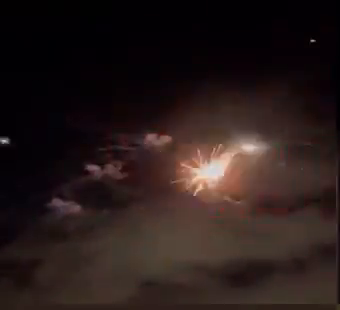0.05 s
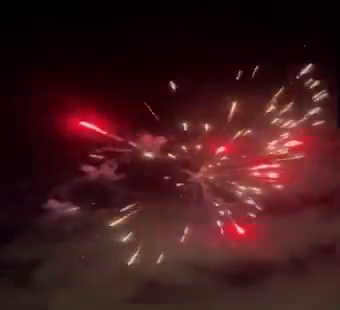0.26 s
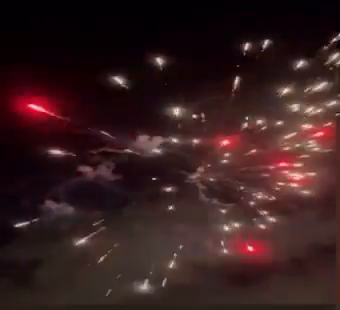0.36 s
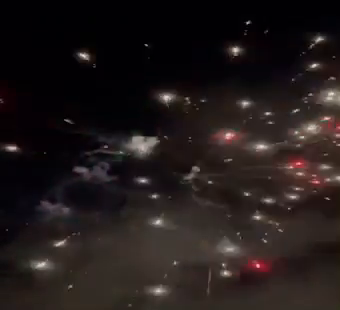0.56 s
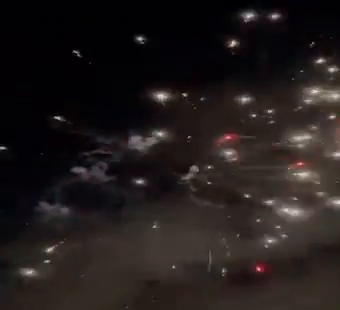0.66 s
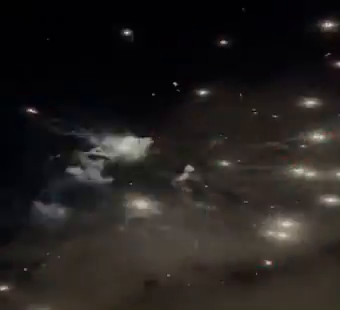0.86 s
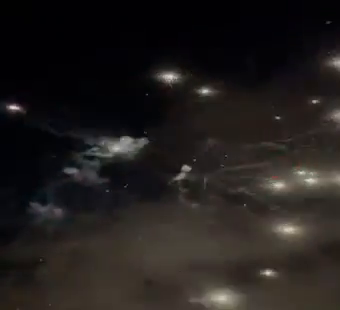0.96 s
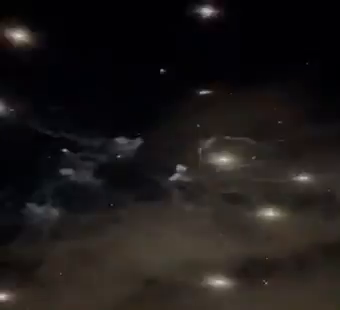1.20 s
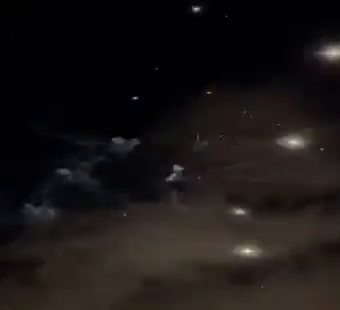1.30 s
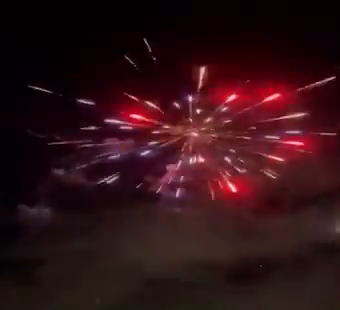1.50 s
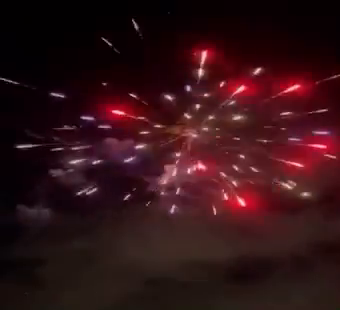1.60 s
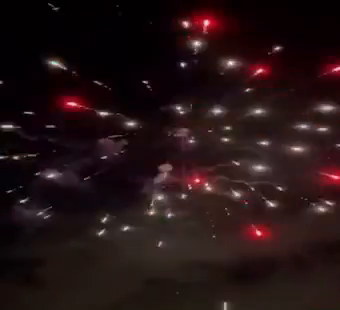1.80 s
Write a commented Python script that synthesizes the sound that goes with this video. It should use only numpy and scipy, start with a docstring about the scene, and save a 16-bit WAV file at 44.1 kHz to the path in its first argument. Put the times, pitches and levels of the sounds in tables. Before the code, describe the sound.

Firework shells explode with two sharp, heavy bangs over a second apart, echoes rumbling into quiet

```python
"""Open ground at night: two firework shells burst high overhead while the roll of an earlier one dies away.
Each blast is a pressure wave with a dull, rough lead-in, a ground bounce, a short ringing and a spit of treble.
Far walls and trees return filtered, smeared copies; noise and sparse knocks form a roll that swells and fades.
Faint steady noise lies beneath. The small recorder delays bass more than treble: each blast is a falling chirp."""
import sys
import numpy as np
from scipy import signal
from scipy.fft import rfft, irfft, next_fast_len
from scipy.io import wavfile
from scipy.ndimage import uniform_filter1d

SR = 44100
rng = np.random.default_rng(int(sys.argv[2]) if len(sys.argv) > 2 else 0)


def transcribe(signal):
    """Save signal, clipped to [-1, 1], as a 16-bit WAV file at the path in sys.argv[1]."""
    frames = np.atleast_2d(signal).T
    limited = np.clip(frames, -1, 1)
    pcm = np.round(limited * 32767).astype(np.int16)
    wavfile.write(sys.argv[1], SR, pcm)


N = 81585
SIZE = next_fast_len(N + 8192)  # padded transform length
HZ = np.fft.rfftfreq(SIZE, 1 / SR)

# Shell bursts; the first precedes the start, so only its roll is heard:
# start_s, blast_db, roll_db, bounce_delay_ms, bounce_left_db, bounce_right_db
BURSTS = [(-1.3, 0, -6.5, 7.5, -8, -12), (.22597, 0.5, 1, 7.4, -5.5, -14),
          (1.5564, 0.5, -1, 7.95, -2, -10.5)]
# Diffuse roll after each burst, each band relative to its own level in the 0.23 s row:
# delay_s, bass_db, body_db, middle_db, treble_db
ROLL = [(.004, -54, -54, -16.5, -26), (.02, -42, -22.5, -35.5, -41.5), (.045, -34, -26, -39.5, -41.5),
        (.09, -41, -29, -43, -51.5), (.13, -29.5, -32, -37.5, -48.5), (.19, -34.5, -26, -36.5, -44),
        (.23, -35.5, -27, -31.5, -49), (.3, -34.5, -32, -32, -49.5), (.38, -41.5, -32, -37.5, -58),
        (.5, -43, -38, -39.5, -61.5), (.6, -47, -41, -43.5, -68.5), (.9, -56, -48.5, -54.5, -78.5),
        (1.15, -58.5, -48.5, -61.5, -85), (1.4, -54.5, -59, -60, -80)]
# Centres of the four roll bands: centre_hz
ROLL_BAND_HZ = [90, 400, 1600, 8000]
# Relative colour of roll and single echoes as heard, with a notch and a steep upper edge:
# frequency_hz, level_db
HEARD_COLOUR = [(30, -14), (53, -0.5), (144, -8), (208, 0.5), (420, -0.5), (808, -6.5), (1510, -9.5),
                (2830, -17.5), (3880, -22.5), (4550, -25), (4800, -50), (5050, -29.5), (5740, -26.5),
                (7300, -31), (7600, -39), (8000, -29.5), (10500, -34.5), (12000, -46), (12400, -61),
                (15500, -100)]
# Share of separate knocks, against noise, in the roll: frequency_hz, share_0_to_1
KNOCK_SHARE = [(200, .3), (1500, 0.46), (4000, 0.2), (9000, 0.3)]
# Likeness of the left and right ports: frequency_hz, likeness_0_to_1
PORT_LIKENESS = [(60, 1.0), (130, 1.0), (290, 0.99), (640, 0.54), (1410, 1), (3100, 0.3), (6820, 0.36),
                 (15000, 0.26)]
# Balance of the two ports: frequency_hz, left_over_right_db
PORT_BALANCE = [(200, -0.5), (500, 3), (1300, 0), (2400, 1.5), (5000, -0.5)]
# Relative colour of the night background: frequency_hz, level_db
AIR_COLOUR = [(18, -53.5), (30, -26), (48, -1), (69, -4), (92, -28.5), (389, -17), (420, -21.5), (532, -18),
              (15500, -77)]
# Colour of the blast: frequency_hz, level_db
BLAST_COLOUR = [(30, -5.5), (50, 8.5), (70, 8.5), (95, 5.5), (125, -3.5), (170, -2.5), (300, 2), (450, 1.5),
                (700, 0), (1400, -4.5), (1600, -9.5), (2150, 6.5), (2550, 0.5), (2900, 5.5), (3700, -3.5),
                (5000, 2.5), (7400, 5.5), (8500, 12), (11500, 1), (13500, -6.5), (15500, -27)]
# Echoes from far walls and trees; the 0.343 s row is the ground bounce of the 0.336 s echo: # start_s,
# level_db, left_over_right_db, bass_db, treble_db
ECHOES = [(0.336, -12, -1, -5.5, 5.5), (0.343, -18.5, 2.5, -7, 5), (0.393, -25, -4, -7, -11),
          (0.407, -11.5, 0, -4.5, -2), (0.427, -14.5, 2, -8, -10), (0.453, -10, -1, -16, 1),
          (0.465, -23, 11, -8, -4), (0.477, -11, -2.5, -8.5, -3), (0.494, -20.5, 3, -12, -8),
          (0.503, -14, -2, -7, -7), (0.519, -15.5, -0.5, -7, -8), (0.532, -29, 0.5, -6.5, -4),
          (0.594, -24, -3, -1, -7), (0.673, -13.5, 1.0, -10.5, -9), (0.723, -36, 1.5, -6.5, -4),
          (0.821, -27.5, -1, -6, -6), (0.884, -26, 0.5, -0.5, -12), (0.933, -39, 1.0, -6, -8),
          (1.005, -36, 0.5, -9.5, -12), (1.594, -17, 13.5, -4, 0), (1.677, -20.5, 0.5, 1, -1),
          (1.727, -14.5, 0.5, -9, -1.5), (1.751, -16, 1, -10.5, -4.5), (1.792, -17, 1, -13, -12)]

ROLL_DB, PATCH_DB = -11, 2.5  # roll gain; depth of its drifting patches
KNOCKS_PER_S, KNOCK_SPREAD_DB = 350, 4
AIR_DB = -58  # rms
BLAST_DB, BLAST_S, FRONT_HZ = 44.5, 0.0011, 900  # gain, time constant, corner that rounds the front
BOUNCE_LAG_S, BOUNCE_BRIGHT_DB, BOUNCE_BRIGHT_HZ = .0003, 6, 1500  # left port hears the bounce later
MONO_HZ = 250  # well below this both ports hear the same bounce
LEAD_S, LEAD_DB, LEAD_HZ = .0075, (-17.5, -12.5), 2500  # lead-in: time early, left and right, corner
LEAD_NOISE_S, LEAD_NOISE_DB = 0.0024, -15  # noise that roughens the lead-in: time constant, level
RING_HZ, RING_T60_S, RING_DB, RING_RISE_S = 8080, 0.019, -19, .0004  # microphone port
SPIT_DB, SPIT_T60_S, SPIT_HZ = -15, .02, 2570  # ragged treble just behind each front
ECHO_GAIN_DB, SMEAR_DB, SMEAR_T60_S = 26.5, -17, .02
POP_HZ = 3000  # well above this an echo is nearly all smear
RUMBLE_CUT_HZ, EDGE_HZ = 32, 15650  # lower and upper limits of the recorder
CHIRP_TURNS, CHIRP_HZ, CHIRP_RAD = 1.485, 56, 4.23  # turns per e-fold of (1 + f / corner), corner, offset
TOP_LAG_S, TOP_HZ = 0.0004, 3000  # greatest extra lag of the treble, corner
CEILING = 1.16  # full-scale units


def amp(db):
    """A level in decibels is twenty times the logarithm of an amplitude ratio."""
    return 10 ** (np.asarray(db) / 20)


def evened(x):
    """Dividing by the root mean square gives unit power."""
    return x / np.sqrt(np.mean(x ** 2) + 1e-20)


def read(points, hz):
    """Hearing spaces pitch by ratio, so curves are interpolated over log frequency."""
    f, value = np.transpose(points)
    return np.interp(np.log(hz + 1), np.log(f + 1), value)


def likeness(hz):
    """Coherence: the likeness of the two ports at each frequency, held between 0 and 1."""
    return np.clip(read(PORT_LIKENESS, hz), 0, 1)


def at(s):
    """Shift theorem: a click at time s has a flat spectrum with linear phase."""
    return np.exp(-2j * np.pi * HZ * np.asarray(s)[..., None])


def spread(field_db, knock_share):
    """Diffuse field: noise and sparse knocks, partly coherent between ports, weighted over pitch and time."""
    struck = rng.random((2, N)) < KNOCKS_PER_S / SR
    strength_db = KNOCK_SPREAD_DB * np.minimum(rng.exponential(1, (2, N)), 3)
    clicks = struck * amp(strength_db) * rng.choice([-1, 1], (2, N))
    raw = [evened(clicks), rng.standard_normal((2, N))]
    hz, t, (knocks, noise) = signal.stft(raw, SR, nperseg=512, noverlap=384)
    share = np.clip(read(knock_share, hz), 0, 1)[:, None]
    common, opposed = np.sqrt(share) * knocks + np.sqrt(1 - share) * noise
    same = likeness(hz)[:, None]
    mid = np.sqrt((1 + same) / 2) * common
    side = np.sqrt((1 - same) / 2) * opposed
    balance = amp(read(PORT_BALANCE, hz)[:, None] / 2)
    ports = np.array([(mid + side) * balance, (mid - side) / balance])
    ports = ports * amp(field_db(hz, t))
    return signal.istft(ports, SR, nperseg=512, noverlap=384)[1][:, :N]


def roll_field(hz, t):
    """Powers add: every burst starts the same swell and decay, each band dying at its own pace."""
    delay_s, *levels = np.transpose(ROLL)
    power = 1e-20
    for s, _, roll_db, *_ in BURSTS:
        # each band is set to 0 dB at its 0.23 s row; silent before the burst
        bands = np.array([np.interp(t - s, delay_s, band - band[6], left=-200) for band in levels])
        level_db = np.array([read(list(zip(ROLL_BAND_HZ, frame)), hz) for frame in bands.T]).T
        power = power + amp(2 * (level_db + roll_db))
    patches = uniform_filter1d(rng.standard_normal(power.shape), 6, 0)
    patches = evened(uniform_filter1d(patches, 10, 1))
    return 10 * np.log10(power) + read(HEARD_COLOUR, hz)[:, None] + PATCH_DB * patches + ROLL_DB


def roll():
    """Time-varying filtering: noise and knocks follow a level that swells after each burst, then dies away."""
    return spread(roll_field, KNOCK_SHARE)


def air():
    """Stationary noise: the faint night background keeps a steady colour and level."""
    sound = spread(lambda hz, t: read(AIR_COLOUR, hz)[:, None] + 0 * t, [(1, 0.0035), (2, 0.0089)])
    return amp(AIR_DB) * evened(sound)


def pressure_wave():
    """Blast wave: overpressure then suction, (1 - u) exp(-u), with its front rounded by a low-pass."""
    u = 2j * np.pi * HZ * BLAST_S
    return u / (1 + u) ** 2 / (1 + 1j * HZ / FRONT_HZ) * amp(BLAST_DB + read(BLAST_COLOUR, HZ))


def port_ring(t):
    """Resonance: the microphone port, struck by a front, rings as a decaying sine."""
    envelope = amp(RING_DB - 60 * t / RING_T60_S) * (1 - np.exp(-t / RING_RISE_S))
    return rfft(np.sin(2 * np.pi * RING_HZ * t) * envelope, SIZE)


def treble_spit(t):
    """Decaying noise: high-passed and blast-coloured, it crackles just behind a front."""
    noise = rng.standard_normal((2, t.size)) * amp(SPIT_DB - 60 * t / SPIT_T60_S)
    return rfft(noise, SIZE) * (HZ / (HZ + SPIT_HZ)) ** 2 * amp(read(BLAST_COLOUR, HZ))


def ground_bounce(arrival_s, left_right_db):
    """Reflection: a later, brighter copy differs between the ports in treble but not in deep bass."""
    port_s = arrival_s + np.array([.5, -.5]) * BOUNCE_LAG_S
    bounce = at(port_s) * amp(left_right_db)[:, None]
    shared = at(arrival_s) * amp(np.mean(left_right_db))
    bounce = bounce + (shared - bounce) / (1 + (HZ / MONO_HZ) ** 2)
    return bounce * amp(BOUNCE_BRIGHT_DB * HZ ** 2 / (HZ ** 2 + BOUNCE_BRIGHT_HZ ** 2))


def rough_lead_in(s, t):
    """Convolution: an early, low-passed click set in swelling and fading noise leads dully into the blast."""
    middle_s = t[t.size // 2]
    swell = amp(LEAD_NOISE_DB) * np.exp(-abs(t - middle_s) / LEAD_NOISE_S)
    noise = rng.standard_normal((2, t.size)) * swell
    roughness = 1 + rfft(noise, SIZE) / at(middle_s) * HZ / (HZ + 300)
    return at(s - LEAD_S) * amp(LEAD_DB)[:, None] * roughness / (1 + 1j * HZ / LEAD_HZ)


def blasts():
    """Superposition: lead-in, direct wave and bounce each carry the same front."""
    t = np.arange(2048) / SR
    steady_part = pressure_wave() + port_ring(t)
    out = 0
    for s, db, _, delay_ms, *bounce_db in BURSTS[1:]:
        front = steady_part + treble_spit(t)
        arrivals = at(s) + ground_bounce(s + delay_ms / 1000, bounce_db) + rough_lead_in(s, t)
        out = out + amp(db) * arrivals * front
    return irfft(out, SIZE)[:, :N]


def echoes():
    """Scattering: each echo or bounce returns a filtered pop plus a short, partly coherent noise smear."""
    t = np.arange(512) / SR
    same = likeness(HZ)
    out = 0
    for s, db, pan_db, bass_db, treble_db in ECHOES:
        taps = rng.standard_normal((2, t.size)) * amp(SMEAR_DB - 60 * t / SMEAR_T60_S)
        common, opposed = rfft(taps, SIZE)
        smear = np.sqrt((1 + same) / 2) * common + np.sqrt((1 - same) / 2) * opposed * [[1], [-1]]
        pop = 1 / (1 + (HZ / POP_HZ) ** 2)
        tilt_db = read([(250, bass_db), (1200, 0), (2500, 0), (6000, treble_db)], HZ)
        colour = amp(db + ECHO_GAIN_DB + read(HEARD_COLOUR, HZ) + tilt_db)
        out = out + at(s) * (pop + smear) * colour * amp([[pan_db / 2], [-pan_db / 2]])
    return irfft(out, SIZE)[:, :N]


def scene():
    """Superposition: the pressures of all sources add."""
    return roll() + air() + blasts() + echoes()


def record(dry):
    """Dispersion: bass and the very top lag; rumble is cut, peaks soften, and the band is limited."""
    lag = np.exp(-1j * (2 * np.pi * CHIRP_TURNS * np.log(1 + HZ / CHIRP_HZ) + CHIRP_RAD))
    lag = lag * np.exp(-2j * np.pi * TOP_LAG_S * (HZ - TOP_HZ * np.arctan(HZ / TOP_HZ)))
    rumble_cut = HZ ** 6 / (HZ ** 6 + RUMBLE_CUT_HZ ** 6)
    x = irfft(rfft(dry, SIZE) * lag * rumble_cut, SIZE)[:, :N]
    x = CEILING * np.tanh(x / CEILING)
    band_limit = signal.firwin(511, EDGE_HZ, window=("kaiser", 9), fs=SR)
    return signal.oaconvolve(x, band_limit[None], "same")


dry = scene()
out = record(dry)
transcribe(out)
```